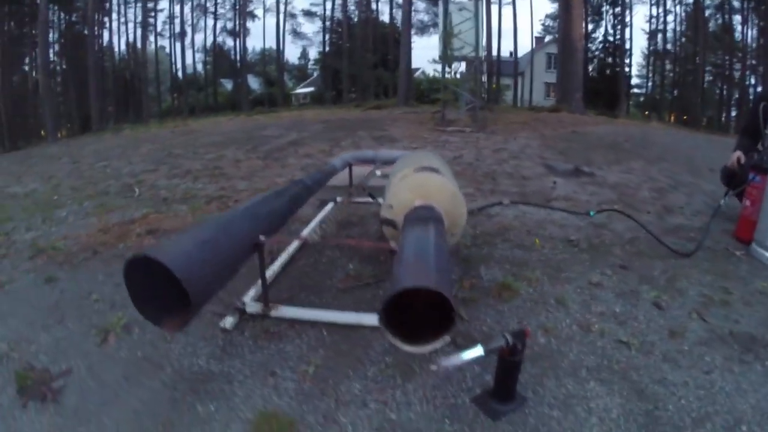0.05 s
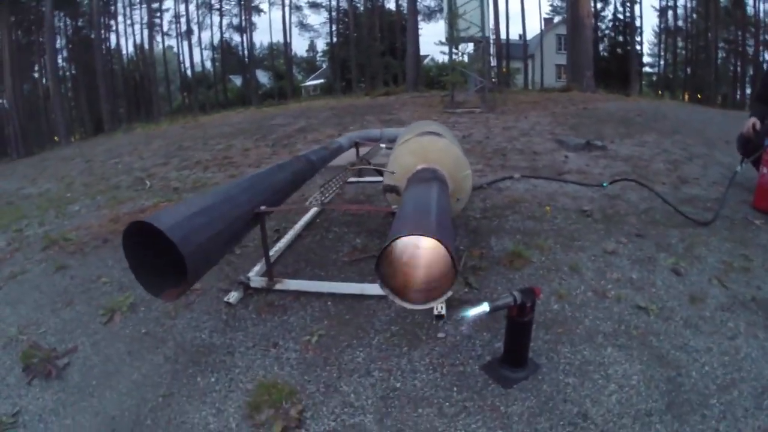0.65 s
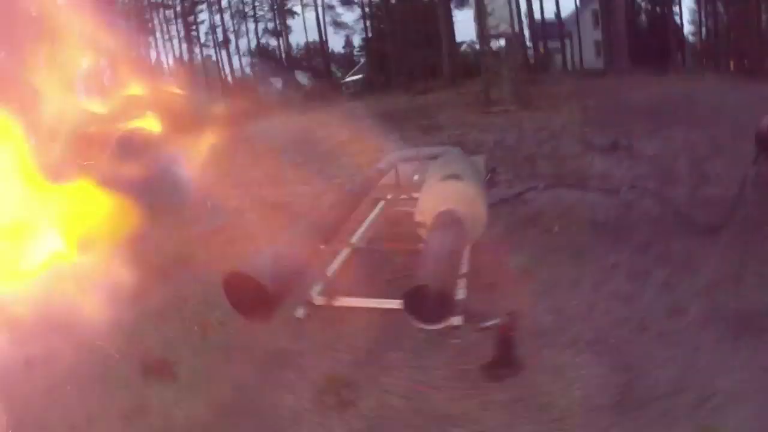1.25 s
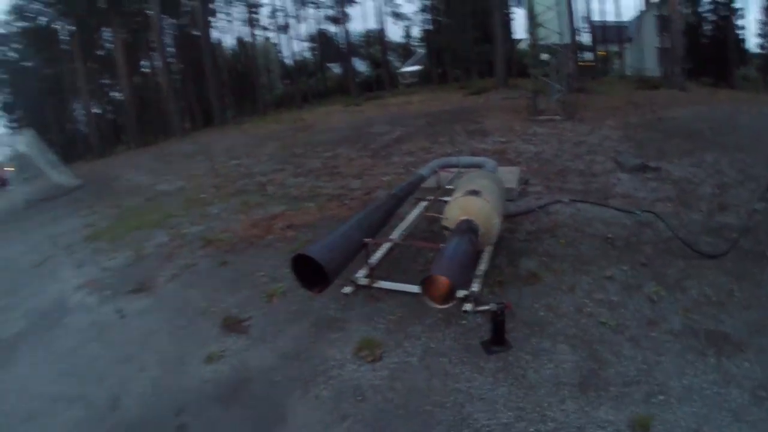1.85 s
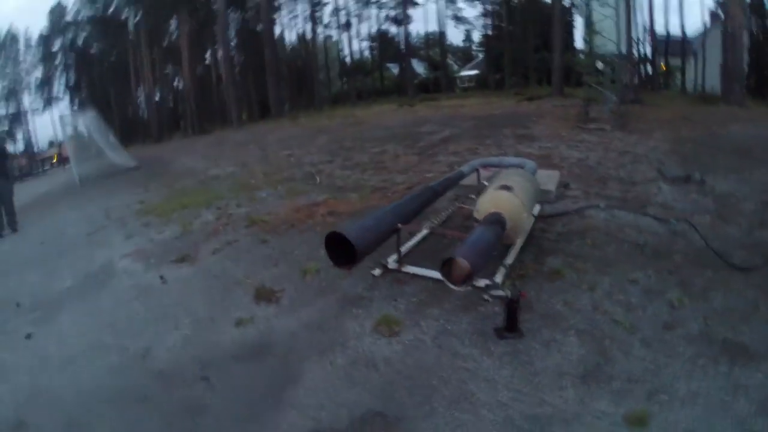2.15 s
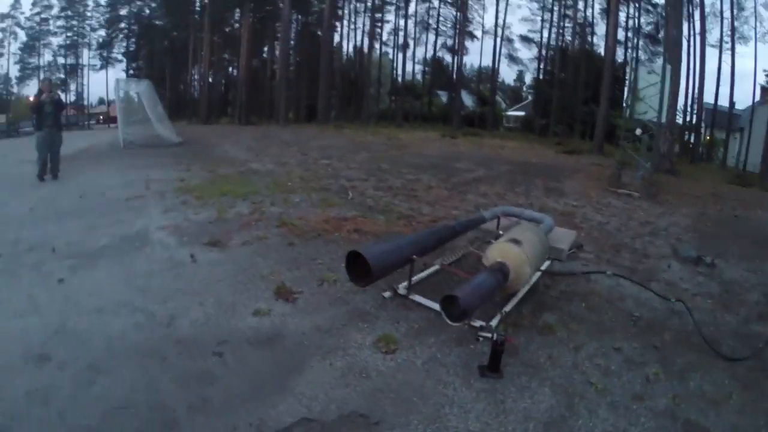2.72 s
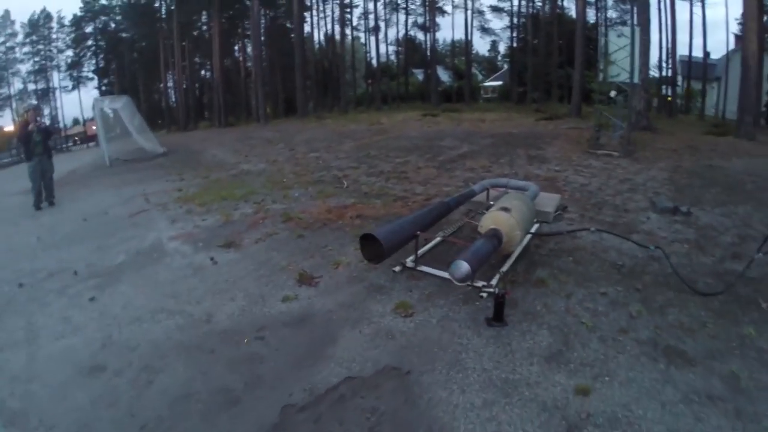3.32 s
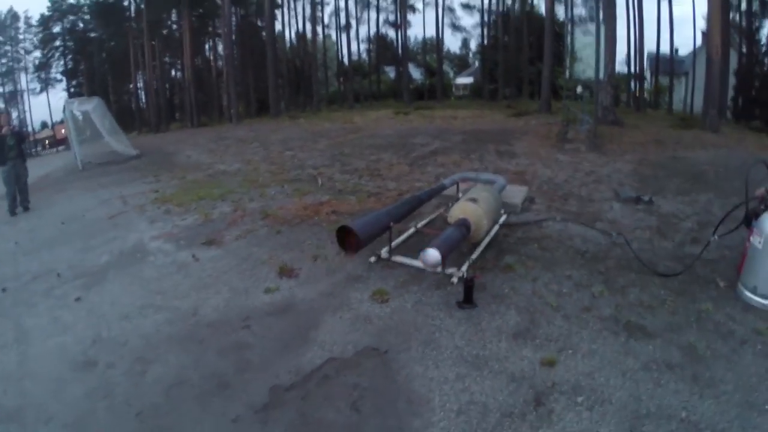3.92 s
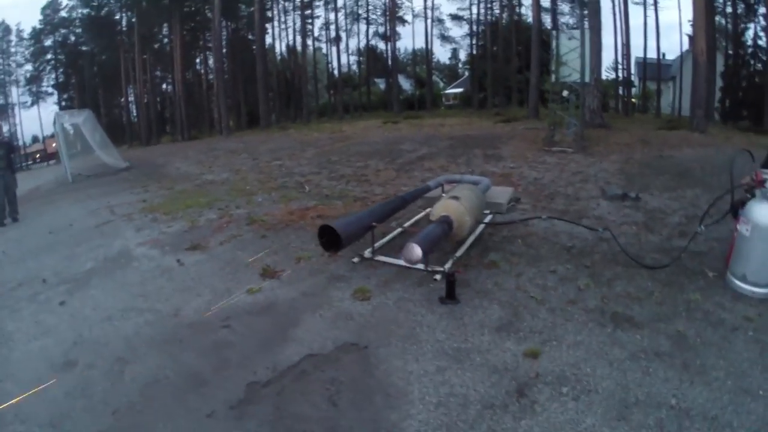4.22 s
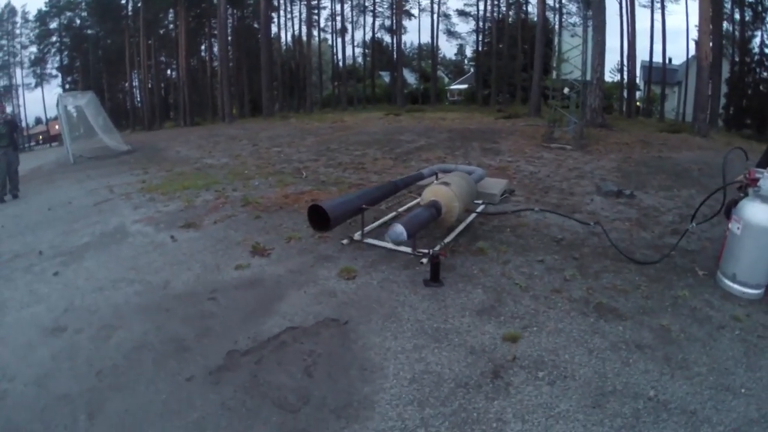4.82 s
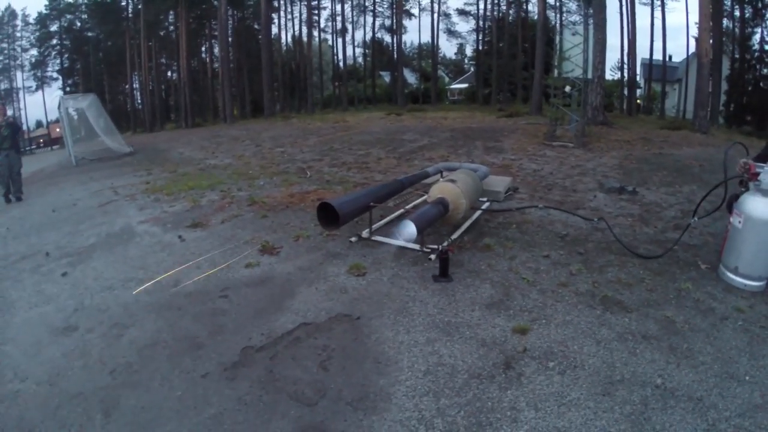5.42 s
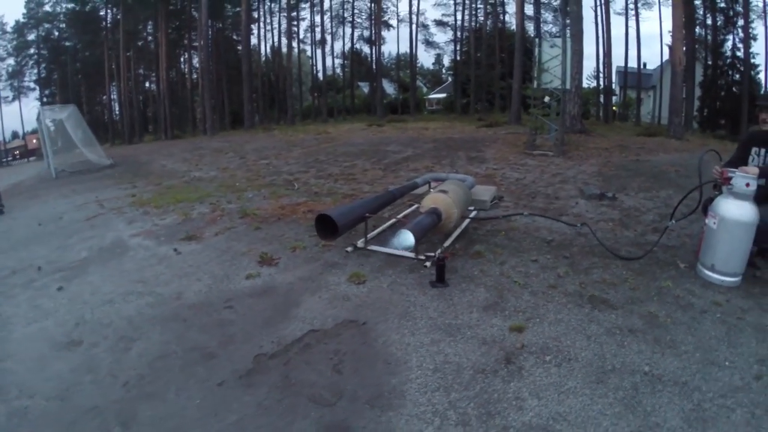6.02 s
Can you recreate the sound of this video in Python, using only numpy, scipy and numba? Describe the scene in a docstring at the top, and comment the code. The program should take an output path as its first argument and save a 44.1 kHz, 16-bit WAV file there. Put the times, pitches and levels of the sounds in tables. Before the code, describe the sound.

Outdoors, a blower whines, then a pulse jet catches, sputtering and popping unevenly before locking into a harsh, rapid, droning blat.

```python
"""A pulse jet, an engine that burns gas in a pipe in quick bangs, starts up on a gravel yard among pines.
It catches, stutters unevenly as it heats, then locks into a steady blat of about 60 firings a second.
A leaf blower roars into its intake over hissing gas, then spins down. The ground and trees echo the jet.
The engine is far louder than the blower: each bang makes a small camera close by turn its own volume
down, and the sharpest bangs still overload it."""
import sys
import numpy as np
from scipy import signal
from scipy.fft import rfft, irfft, next_fast_len
from scipy.io import wavfile
from scipy.ndimage import map_coordinates
from numba import njit

SR = 44100
rng = np.random.default_rng(int(sys.argv[2]) if len(sys.argv) > 2 else 0)


def wav_record(signal):
    """Record a signal, one row per channel, as 16-bit PCM in the file named by sys.argv[1]."""
    frames = np.transpose(np.atleast_2d(signal))
    bounded = np.clip(frames, -1, 1)
    # unit amplitude maps onto the largest positive 16-bit level
    quanta = np.round(bounded * 32767).astype(np.int16)
    wavfile.write(sys.argv[1], SR, quanta)


N = 271656
TIME = np.arange(N) / SR
AROUND = np.arange(-SR // 30, SR // 25) / SR  # seconds before and after one firing
OTHER_MOUTH_S = 0.00763  # the pipe's other opening answers this much later


def pulse_jet():
    """The whole engine: gas explodes again and again, and the moving air sounds the pipe."""
    cycles, loud = cycle_count()
    air = air_swing(cycles) + outflow(cycles) + pipe_hum() + intake(cycles)
    return air + explosions(*firings(cycles, loud)) + hoots() + mouth_note()

# How hard the gas burns, as the peak of an ordinary firing: t/s, level/dB
BURN_STRENGTH = [(.55, -32), (.72, -30), (.8, 8.5), (.95, 19), (1.05, 25.5), (1.33, 18.5), (1.45, 10.5),
                 (1.65, 12.5), (1.9, 7), (2.2, 19), (2.55, 16), (2.8, 26), (3.2, 19.5), (3.5, 32.5),
                 (3.9, 18), (4.1, 30.5), (6.16, 31.5)]
def burn_db():
    """The flame flares, nearly goes out, then builds."""
    return curves(BURN_STRENGTH)[0]

# How warm the pipe is: t/s, warmth (0 cold, 1 hot)
WARMTH = [(.7, 0.022), (1.1, 0.65), (1.5, .22), (1.75, 0.33), (2.7, 0.85), (4.3, 0.93)]
def with_heat(cold, hot):
    """A setting that slides from cold to hot with the warmth of the pipe."""
    return cold + (hot - cold) * curves(WARMTH)[0]

def with_lock(stuttering, steady):
    """A setting that changes as the firing locks to the pipe's own rhythm."""
    lock_s, locking_s = 3.93, 0.11
    return np.interp(TIME, [lock_s, lock_s + locking_s], [stuttering, steady])

# Firings a second: t/s, f/Hz
FIRING_RATE = [(0.7, 52.8), (1.0, 54), (3.9, 58.04), (4.05, 55.97), (4.23, 61.45), (4.34, 59.66),
               (4.45, 61.4), (4.85, 61.37), (4.95, 55.6), (5.02, 62.3), (5.12, 60.53), (5.45, 62.6),
               (5.8, 64.1), (6.16, 62.3)]
def cycle_count():
    """Count the pipe's cycles, nudged so each listed bang starts one; also say which ones those are."""
    free = np.cumsum(curves(FIRING_RATE)[0]) / SR
    at_bangs = np.interp(np.transpose(STANDOUT_BANGS)[0], TIME, free)
    whole = np.cumsum(np.r_[0, np.maximum(np.round(np.diff(at_bangs)), 1)])
    return free + np.interp(free, at_bangs, whole - at_bangs), whole.astype(int)

# Bangs that stand out: t/s, peak level/dB, width/s, crack level/dB compared with the peak
STANDOUT_BANGS = [(.7104, -1, 0.0015, -7), (.7593, 24.5, 0.0024, -12.5), (.8311, 16.5, 0.0094, -18),
                  (.8929, 28.5, 0.0039, -16), (.9836, 26, 0.0098, -25), (1.0218, 41, 0.0017, -10),
                  (1.0555, 27, .004, -14), (1.0894, 31.5, 0.004, -11.5), (1.1447, 25, .0048, -14.5),
                  (1.179, 23, 0.0043, -8), (1.1973, 28, 0.0047, -12), (1.2702, 28.5, 0.0058, -36),
                  (1.303, 24.5, 0.0062, -46), (1.3382, 22, 0.0057, -43), (1.4906, 16, 0.004, -16),
                  (1.5269, 17.5, 0.011, -22), (1.5802, 16.5, 0.0039, -17), (1.6179, 20.5, 0.0031, -24),
                  (1.636, 12, 0.0055, -19), (1.6542, 16, 0.0053, -11.5), (1.6975, 8.5, 0.0078, -16),
                  (1.7153, 15, 0.0084, -13.5), (1.7358, 16.5, 0.0029, -17.5), (1.779, 14, 0.0027, -17),
                  (1.8347, 13.5, 0.0071, -27), (1.8924, 11, 0.009, -18), (1.9639, 15, 0.0037, -18),
                  (1.9817, 15, 0.0059, -12), (2.0237, 15.5, 0.0034, -19), (2.0805, 30, 0.0026, -17.5),
                  (2.1282, 25.5, 0.0036, -19.5), (2.163, 21.5, 0.0059, -25), (2.1992, 24, 0.0049, -23),
                  (2.2511, 24, 0.003, -17.5), (2.2698, 25.5, 0.0042, -12.5), (2.3083, 36.5, 0.002, -13.5),
                  (2.4361, 29, 0.0039, -19), (2.5227, 23, 0.0058, -23), (2.5406, 21.5, 0.0027, -16),
                  (2.5737, 40.5, 0.0017, -20.5), (2.6812, 29.5, 0.0039, -17.5),
                  (2.7349, 34.5, 0.003, -22.5), (2.8965, 36, 0.0031, -18.5), (2.9284, 33, 0.0035, -17),
                  (3.0328, 31.5, 0.0038, -20.5), (3.1036, 23.5, 0.005, -13), (3.1218, 27, 0.0041, -12.5),
                  (3.1395, 31, 0.0031, -17), (3.1765, 24.5, 0.0045, -13.5), (3.2992, 42.5, 0.0017, -20.5),
                  (3.3315, 35.5, 0.003, -16), (3.3663, 39, 0.0028, -20), (3.4363, 35.5, 0.0036, -14.5),
                  (3.4684, 35, 0.0028, -21), (3.5194, 38.5, 0.0035, -14.5), (3.6583, 36.5, 0.0027, -16.5),
                  (3.7268, 32, 0.0032, -19.5), (3.7944, 27, 0.0054, -17), (3.8297, 29, 0.003, -18.5),
                  (3.8659, 32.5, 0.0032, -28), (3.9168, 29.5, 0.0028, -21), (3.9844, 25.5, .0042, -26),
                  (4.0022, 27.5, 0.0029, -12.5), (4.1272, 34.5, 0.002, -15.5), (4.808, 26.5, 0.0039, -8),
                  (4.857, 35, 0.0029, -17), (5.009, 38, 0.0021, -16.5), (5.0243, 35, 0.0017, -15),
                  (5.495, 34.5, .0022, -15), (5.5765, 33.5, 0.0022, -15), (5.6084, 33, 0.0025, -15),
                  (5.7198, 34.5, 0.0018, -8), (5.735, 27.5, 0.0017, -4), (5.8309, 31, 0.0025, -11),
                  (5.8625, 30, 0.0014, -16.5), (5.9602, 25.5, 0.0022, -5), (5.9762, 29, 0.0022, -11.5),
                  (6.04, 32, 0.0018, -13.5)]
def firings(cycles, loud):
    """Plan one explosion per cycle; in the stutter, a standout bang starves the firing after it."""
    at = np.minimum(np.searchsorted(cycles, np.arange(int(cycles[-1]) + 1)), N - 1)
    force, spit, late = rng.standard_normal((len(at), 3)).T
    extra_db = with_lock(1.8, .8)[at] * force
    starved_db = with_lock(7.5, -1)[at] * np.isin(np.arange(len(at)), loud + 1)
    usual_width = with_lock(0.0064, 0.0029) * with_heat(0.97, 0.93)
    rows = np.c_[at / SR + .00006 * late,
                 burn_db()[at] + extra_db - starved_db,
                 usual_width[at] * np.exp(-0.09 * extra_db),  # stronger firings are shorter
                 with_lock(-24.5, -19.5)[at] + 1.6 * spit]
    rows[loud] = STANDOUT_BANGS
    times, peak_db, width, crack_db = rows.T
    return np.round(times * SR) / SR, peak_db[:, None], width[:, None], (peak_db + crack_db)[:, None]

def explosions(times, peak_db, width, crack_db):
    """Each firing thumps and rings; short ones steepen into cracking shock waves, soft ones cough."""
    sharpness = 1 / (1 + (width / 0.0034) ** 4)
    answer = with_heat(0.037, 0.15)[np.minimum((times * SR).astype(int), N - 1), None]  # other mouth
    lead_s = 0.3 * width  # the shock runs ahead of the peak
    crack = amp(crack_db)
    pressure = thumps(times, amp(peak_db), width, answer * sharpness)
    snaps = shock_snaps(times, sharpness * crack, lead_s, answer)
    sizzle = shock_sizzle(times, sharpness * crack, lead_s, answer)
    cough = coughs(times, (1 - 0.59 * sharpness) * crack, width)
    return pressure + tailpipe_ring(pressure) + snaps + sizzle + cough

def thumps(times, strength, width, kick):
    """A firing pushes gas out, kicks again from the other mouth, and sucks as much air back in."""
    push = .95 * spike(AROUND, width * np.where(AROUND < 0, .34, .44), tip=0.99)
    push += kick * spike(AROUND - OTHER_MOUTH_S, 0.00025, tip=0.73)
    refill_s = 0.0014 + 0.13 * width
    suction = np.exp(-.5 * ((AROUND - .0033 - 0.39 * width) / refill_s) ** 2)
    suction *= push.sum(1, keepdims=True) / suction.sum(1, keepdims=True)
    return overlap(times, AROUND, strength * (push - suction))

# Pitches the tailpipe rings at: f/Hz, width/Hz, level/dB
TAILPIPE_NOTES = [(283, 160, 1), (394, 8.4, -9), (492.5, 43, 14), (550, 37, 11), (670, 46, 11.5),
                  (1110, 1300, -6)]
def tailpipe_ring(pressure):
    """Each thump rings the tailpipe, more freely as it warms."""
    return resonate(pressure * amp(with_heat(-13, -1.5)), TAILPIPE_NOTES, top_hz=2200)

# Tone of a shock wave's snap, from bass to treble: f/Hz, level/dB
SNAP_TONE = [(80, -14.5), (300, -5.5), (700, 3), (950, 0.5), (1200, 8.5), (1450, 2), (1800, -2.5),
             (2150, -10), (2550, -20), (3300, -17.5), (4400, -20.5), (5400, -30), (7000, -32),
             (10000, -41.5), (15000, -56)]
def shock_snaps(times, strength, lead_s, answer):
    """A shock wave snaps at its front, and again from the other mouth."""
    height = strength * amp(1)
    first = overlap(times - lead_s[:, 0], np.zeros(1), height)
    second = overlap(times + OTHER_MOUTH_S, np.zeros(1), 1.2 * answer * height)
    return signal.fftconvolve(first + second, shortest_click(SNAP_TONE))[:N]

# Tone of the sizzle: f/Hz, level/dB
SIZZLE_TONE = [(90, -19), (220, 3.5), (350, -11.5), (520, 2.5), (700, 4.5), (1200, 4), (1800, -12.5),
               (2500, -16), (3400, -22.5), (4400, -19), (5400, -30.5), (6800, -29), (8500, -37.5),
               (10500, -40.5), (15000, -62.5)]
def shock_sizzle(times, strength, lead_s, answer):
    """A short burst of noise trails each shock wave from both mouths."""
    since_front = AROUND + lead_s
    first = spike(since_front, np.where(since_front < 0, .0002, .0011), tip=0.98)
    second = 2.8 * answer * spike(AROUND - OTHER_MOUTH_S, 0.00074, tip=0.35)
    return overlap(times, AROUND, strength * amp(-1.5) * (first + second)) * noise(SIZZLE_TONE)

# Tone of the breath in a cough: f/Hz, level/dB
COUGH_TONE = [(250, -7), (420, -1), (650, -8.5), (810, 12.5), (1000, 11.5), (1250, 9), (1700, -19.5),
              (3000, -40.5), (8000, -44.5)]
def coughs(times, strength, width):
    """A soft firing coughs a hollow, wavering note through the mouth while the pressure rises."""
    puffs = overlap(times, AROUND, strength * spike(AROUND + 0.23 * width, 0.84 * width, tip=0.39))
    note_hz = 996 + 90.03 * wobble(200)
    note = np.sin(2 * np.pi * np.cumsum(note_hz) / SR)
    return puffs * (amp(-6) * note + amp(-12.5) * noise(COUGH_TONE))

def air_swing(cycles):
    """The air in the pipe swings to and fro once a cycle, more freely when cold."""
    level_db = burn_db() + with_lock(-12, -44) + with_heat(3.5, -2) + 3.2 * wobble(3.11)
    return amp(level_db) * np.cos(2 * np.pi * (cycles + 0.016))

# Swirl of the exhaust, growing as the pipe draws harder: t/s, level/dB compared with the burn
SWIRL_LEVEL = [(1.0, -27), (1.33, -36), (1.9, -28.5), (2.3, -27), (2.8, -23.5), (3.5, -19.5), (4.1, -22),
               (6.16, -19)]
# Tone of that swirl: f/Hz, level/dB
SWIRL_TONE = [(120, 4), (250, 4), (380, 1.5), (520, 11), (585, -11.5), (700, 2), (1200, -22.5),
              (1800, -14.5), (2500, -35.5), (3400, -46), (4400, -34), (5400, -50.5), (6800, -54.5),
              (10000, -63), (15000, -68)]
def outflow(cycles):
    """Swirling gas rushes out after each firing, with a lull before the next."""
    lull = .07
    flow = lull + 1 / (1 + np.exp(-5 * (np.cos(2 * np.pi * (cycles - .24)) + 0.5)))
    return amp(burn_db() + curves(SWIRL_LEVEL)[0] + 1.5 * wobble(45)) * flow * noise(SWIRL_TONE)

# Pitches the pipe hums at: f/Hz, width/Hz, level/dB
PIPE_NOTES = [(111, 25, 2.5), (149.5, 14, 5.5), (252, 6.7, 1.5), (434, 29, -30), (946, 106, -38)]
def pipe_hum():
    """Churning gas makes the pipe hum."""
    level_db = burn_db() + with_lock(-20, -24) + 2.2 * wobble(20)
    return amp(level_db) * unit(resonate(rng.standard_normal(N), PIPE_NOTES, top_hz=1240))

# Tone of the air sucked in: f/Hz, level/dB
INTAKE_TONE = [(500, -24), (800, -8), (1080, 2), (1450, -6), (2500, -32), (3500, -15), (4400, -13),
               (5300, -27), (6800, -25), (12000, -39.5)]
def intake(cycles):
    """Air rasps in at the mouth in uneven gulps after each firing."""
    gulps = 1 + 0.68 * np.cos(2 * np.pi * (cycles - .33))
    gust_db = with_lock(3.2, 1.4) * wobble(35)
    return amp(burn_db() + with_lock(-39.5, -42) + gust_db) * gulps * noise(INTAKE_TONE)

# The lower hoot: t/s, f/Hz, level/dB compared with the burn
LOW_NOTE = [(.75, 90, -22), (1.0, 138, -14), (1.06, 180, -14.5), (1.12, 184, -13), (1.3, 170, -15.5),
            (1.44, 177, -18.5), (1.55, 168, -26), (2.0, 157, -17.5), (2.4, 172, -25), (3.9, 172, -23.5),
            (4.3, 180, -42)]
# The higher hoot: t/s, f/Hz, level/dB compared with the burn
HIGH_NOTE = [(.8, 160.4, -29), (.98, 241.2, -20), (1.08, 278.5, -21.5), (1.25, 279.2, -33),
             (1.7, 272.2, -34), (1.98, 265.3, -20), (2.08, 249.6, -23), (2.2, 282, -23.5),
             (2.6, 297.5, -28.5), (3.0, 292, -26.5), (3.9, 279.8, -23), (4.3, 276.8, -27.5)]
def hoots():
    """The uneven flame blows two notes that drift with the gas's heat and weaken once the firing locks."""
    return amp(burn_db()) * (fuzzy_note(LOW_NOTE) + fuzzy_note(HIGH_NOTE))

# The hollow sound of the mouth: t/s, f/Hz, level/dB
MOUTH_DRIFT = [(.75, 1003, -32.5), (1.1, 1056, -27), (1.4, 915, -23), (1.65, 958, -14.5), (1.85, 884, -19),
               (2.05, 906, -13.5), (2.3, 999, -16), (2.8, 1082, -12.5), (3.2, 1084, -13),
               (3.9, 1100, -34.5)]
def mouth_note():
    """Air blown through the pipe's mouth makes a breathy, drifting note, even while the flame is weak."""
    hz, db = curves(MOUTH_DRIFT)
    angle = 2 * np.pi * np.cumsum(hz) / SR
    return amp(db) * unit(wobble(260) * np.cos(angle) + wobble(260) * np.sin(angle))

# Turns a second of the blower's shaft: t/s, f/Hz
SHAFT_SPEED = [(0, 229.7), (0.76, 229.7), (1.3, 234), (1.8, 233), (2.1, 230), (2.68, 228), (2.79, 205),
               (2.9, 188), (4, 110)]
# Loudness of the blower at full speed, which dips and then swells back: t/s, level/dB
BLOWER_LEVEL = [(0, -14), (.66, -14.5), (1.5, -21.5), (2.7, -13)]
# Pitches its casing hums at: f/Hz, width/Hz, level/dB
CASING_NOTES = [(387, 10, -8), (1300, 63, -13), (3256, 580, 5.5), (4190, 360, 2)]
# Tone of its blast of air: f/Hz, level/dB
BLAST_TONE = [(76, -44.5), (130, -25.5), (186, -13), (223, -3.5), (262, -5.5), (467, 0), (851, -1.5),
              (1100, 4), (1550, -3.5), (2140, -2.5), (2460, -11), (3740, -24.5), (4210, -11.5),
              (6160, -14.5), (15400, -42)]
def leaf_blower():
    """A blast of air, a humming casing and a whining fan, all fading as the shaft slows."""
    shaft_hz, full_db = curves(SHAFT_SPEED) + curves(BLOWER_LEVEL)
    level_db = full_db + 16 * np.log2(shaft_hz / shaft_hz[0])  # half the speed is 16 dB quieter
    whine = fan_whine(shaft_hz)
    casing = unit(resonate(rng.standard_normal(N), CASING_NOTES, top_hz=6000))
    blast = amp(-2.0 + 0.56 * wobble(40)) * noise(BLAST_TONE)
    return amp(level_db) * (blast + amp(-12) * casing + whine)

# The fan's tones: vibrations per turn, level/dB
FAN_TONES = [(1, -17.5), (3, -14), (6, -18.5), (10, -28.5), (15, -26.5), (18, -19.5)]
# The whistle of the blades fades and swells: t/s, level/dB
BLADE_WHISTLE = [(0, -9.5), (.07, -15), (.16, -23), (0.3, -14.5), (0.4, -9.5), (.5, -9), (.62, -14),
                 (0.72, -11), (1.0, -13), (2.7, -14), (2.8, -4), (2.88, -1), (2.95, -14)]
def fan_whine(shaft_hz, blades=9):
    """The spinning fan sings at whole multiples of its turning speed."""
    turns = np.cumsum(shaft_hz * (1 + 0.00037 * wobble(26))) / SR
    def tone(per_turn, db):
        height = amp(db + 0.82 * wobble(13)) * np.sqrt(2)
        return height * np.sin(2 * np.pi * (round(per_turn) * turns + rng.random()))
    return sum(tone(*row) for row in FAN_TONES) + tone(blades, curves(BLADE_WHISTLE)[0])

# The gas catching fire: t/s, rumble level/dB, roar level/dB
LIGHTING_LEVELS = [(0, -31.5, -20.5), (0.2, -29, -27.5), (0.3, -31, -38), (0.45, -27.5, -29),
                   (0.58, -26, -45), (0.67, -18, -19.5), (0.75, -11, -11), (1, -14, -24),
                   (1.5, -69.5, -57.5)]
# Tone of the rumble: f/Hz, level/dB
RUMBLE_TONE = [(20, -28.5), (32, -4), (49, -5), (70, 1.5), (100, 1), (125, -13), (158, 1.5), (200, -12),
               (300, -62)]
# Tone of the flame's roar: f/Hz, level/dB
ROAR_TONE = [(60, -29.5), (120, -0.5), (230, -21), (380, 6.5), (600, -5), (1300, -14.5), (3000, -41)]
# The air in the pipe throbs, leading up to the first bangs: t/s, f/Hz, level/dB
THROB_NOTE = [(0, 50, -24), (.18, 49.3, -18), (.3, 50.2, -30.5), (.45, 50.6, -23.5), (.62, 49.5, -26.5),
              (.73, 38.7, -1), (.8, 45, -33), (.95, 49.3, -63.5)]
# The flame howls as it catches: t/s, f/Hz, level/dB
HOWL_NOTE = [(.5, 383, -69), (.59, 383.2, -18.5), (.67, 374.2, -27), (.75, 396, -23), (.8, 393, -32),
             (.95, 400, -73)]
def ignition():
    """Gas first lights in the blown pipe with a swelling rumble, a roar, a throb and a howl."""
    rumble_db, roar_db = curves(LIGHTING_LEVELS)
    flame = amp(rumble_db) * noise(RUMBLE_TONE) + amp(roar_db) * noise(ROAR_TONE)
    return flame + fuzzy_note(THROB_NOTE) + fuzzy_note(HOWL_NOTE)

# Tone of the gas jet: f/Hz, level/dB
HISS_TONE = [(900, -7), (1600, 9), (2300, 11.5), (2900, 2.5), (3400, 8), (3900, -3), (4500, 2), (5800, 5.5),
             (6800, -4.5), (7800, -19.5), (9300, -11.5), (12000, -24.5), (15000, -39.5)]
def gas_hiss(on_s=0.72, opening_s=0.3, swell_s=1.488, swell_width_s=0.055):
    """The gas jet opens and hisses into the chamber; the hiss swells briefly about 1.5 s in."""
    valve = np.clip((TIME - on_s) / opening_s, 0, 1)
    swell_db = 9 * np.exp(-((TIME - swell_s) / swell_width_s) ** 2)
    return valve * amp(with_lock(-24.5, -21.5) + swell_db + 2.4 * wobble(35)) * noise(HISS_TONE)

# How long the echo takes to fade by 60 dB: f/Hz, t/s
ECHO_FADE = [(60, 0.88), (250, 0.32), (1000, 0.12), (4000, 0.039), (12000, 0.21)]
def pine_echo(x):
    """Sound scatters off the ground and trunks; the bass lingers longest."""
    hz, t, hiss = signal.stft(rng.standard_normal(SR // 2), SR, nperseg=256)
    tail = signal.istft(hiss * amp(-60 * t / along(ECHO_FADE, hz)[:, None]), SR, nperseg=256)[1]
    echo = signal.fftconvolve(np.pad(x, (SR // 100, 0)), tail / np.linalg.norm(tail))[:N]
    return filtered(echo, lambda f: f ** 2 / (f ** 2 + 130 ** 2))  # long waves pass between the trunks

def amp(db):
    """Turn decibels into a number to multiply by."""
    return 10 ** (np.asarray(db) / 20)

def unit(x):
    """Scale a sound to an average strength (rms) of 1."""
    return x / np.sqrt(np.mean(x ** 2) + 1e-20)

def along(points, hz):
    """Read between (f/Hz, value) points on a musical pitch scale."""
    f, v = np.transpose(points)
    return np.interp(np.log(hz + 1), np.log(f + 1), v)

def curves(rows):
    """Join a table's points over time: one curve for each column after t/s."""
    times, *columns = np.transpose(rows)
    return [np.interp(TIME, times, column) for column in columns]

def wobble(rate):
    """A smooth curve through `rate` random values a second."""
    return map_coordinates(rng.standard_normal(int(N * rate / SR) + 4), [np.arange(N) * rate / SR])

def filtered(x, response):
    """Turn each frequency up or down by response(hz)."""
    size = next_fast_len(N + SR // 2)
    return irfft(rfft(x, size) * response(np.fft.rfftfreq(size, 1 / SR)), size)[:N]

def noise(tone):
    """Noise of strength 1 with the given balance of bass and treble."""
    return unit(filtered(rng.standard_normal(N), lambda hz: amp(along(tone, hz))))

def resonate(x, notes, top_hz):
    """Let a sound ring at the given notes, muffled above top_hz."""
    ring = lambda f: sum(amp(db) * 1j * f * w / (c * c - f * f + 1j * f * w) for c, w, db in notes)
    return filtered(x, lambda f: ring(f) / (1 + (f / top_hz) ** 4))

def fuzzy_note(rows, fuzz=.55, flutter_hz=22):
    """A flame-blown note that flutters in loudness and pitch."""
    hz, db = curves(rows)
    angle = 2 * np.pi * np.cumsum(hz) / SR
    note = (1 + fuzz * wobble(flutter_hz)) * np.cos(angle)
    return amp(db) * unit(note + fuzz * wobble(flutter_hz) * np.sin(angle))

def spike(t, width, tip):
    """A pressure peak of height 1 with steep sides and a rounded tip."""
    return np.exp(tip - np.hypot(t / width, tip))

def shortest_click(tone, size=1024):
    """The shortest click that has this tone, with a peak of 1."""
    cepstrum = irfft(np.log(amp(along(tone, np.fft.rfftfreq(size, 1 / SR)))))
    click = irfft(np.exp(rfft(np.r_[cepstrum[0], 2 * cepstrum[1:size // 2]], size)))
    return click / np.abs(click).max()

def overlap(times, t, shapes):
    """Add up one shape per event; t is the time around each event."""
    index = np.round((times[:, None] + t) * SR).astype(int)
    return np.bincount(np.maximum(index, 0).ravel(), shapes.ravel(), N)[:N]

@njit
def follow(size, floor, attack, release):
    """A level that climbs quickly to each peak and sinks slowly, never below floor; times in samples."""
    level = np.empty(len(size))
    now = floor
    for i in range(len(size)):
        now = max(floor, now + (size[i] - now) / (attack if size[i] > now else release))
        level[i] = now
    return level

def scene():
    """The engine with its echo, the blower and the gas."""
    jet = pulse_jet()
    return (jet + amp(-14.5) * pine_echo(jet) + leaf_blower() + ignition() + gas_hiss())[None]

def record(dry):
    """The camera turns down on loud peaks, flattens what slips through, and trims deep bass and treble."""
    ceiling, grab_s, recover_s = float(amp(-8)), 0.0021, 0.13
    held = dry[0] * ceiling / follow(np.abs(dry[0]), ceiling, grab_s * SR, recover_s * SR)
    thin = filtered(held, lambda hz: hz ** 4 / (hz ** 4 + 24 ** 4))
    fade_out = np.minimum(TIME[::-1] / .003, 1)
    treble_cut = lambda hz: (hz < 15500) / np.sqrt(1 + (hz / 13500) ** 10)
    return filtered(np.clip(thin, -1, 1) * fade_out, treble_cut)[None]


dry = scene()
out = record(dry)
wav_record(out)
```